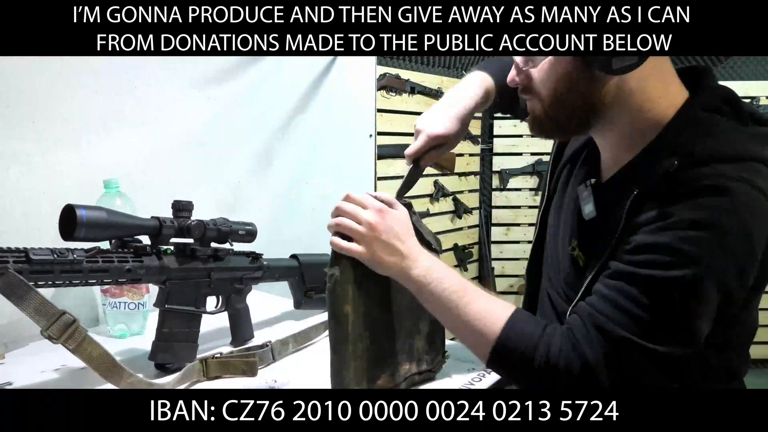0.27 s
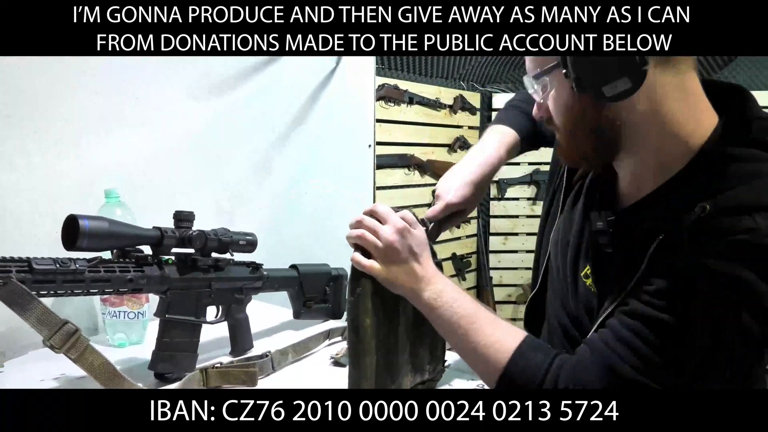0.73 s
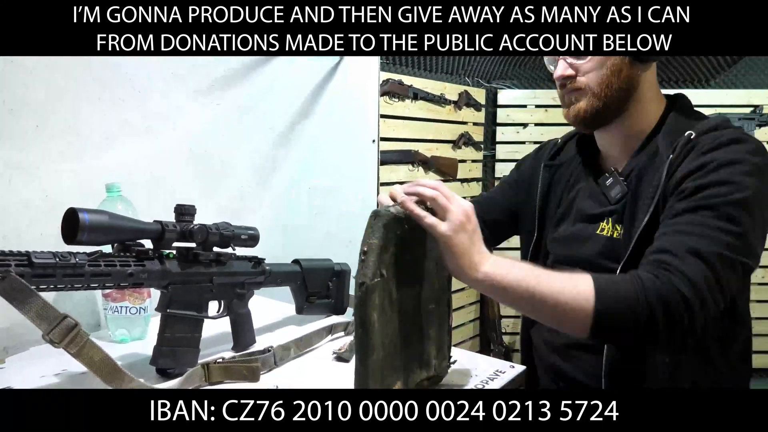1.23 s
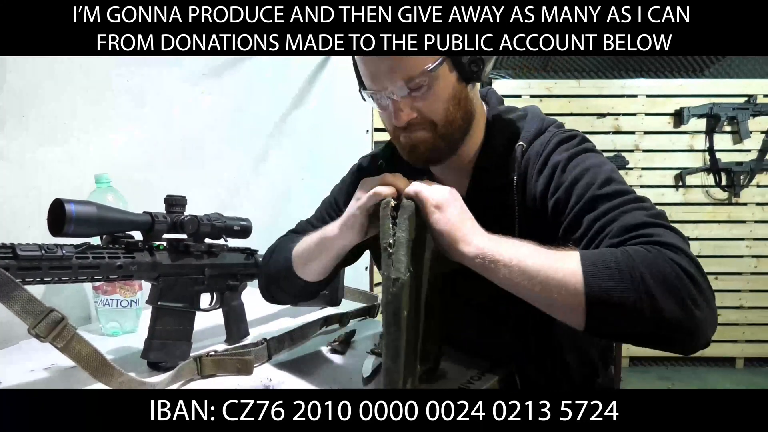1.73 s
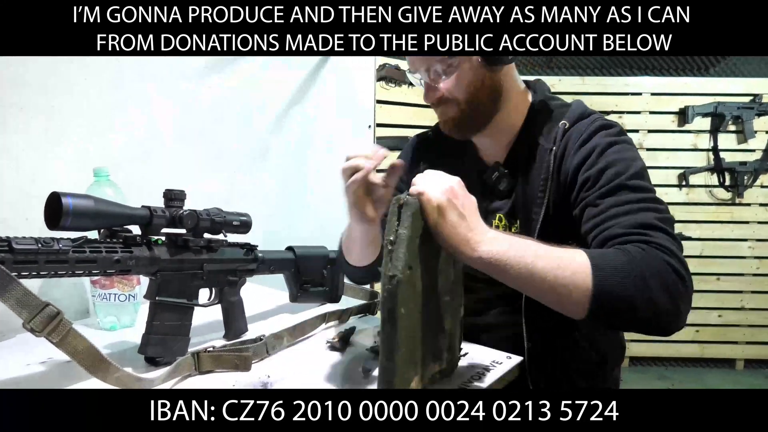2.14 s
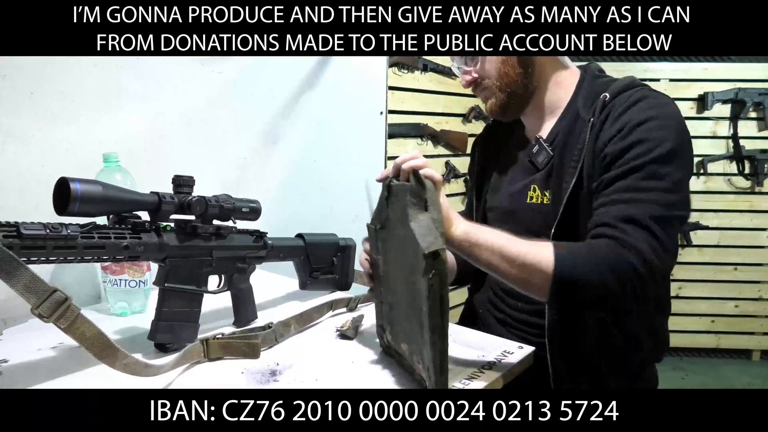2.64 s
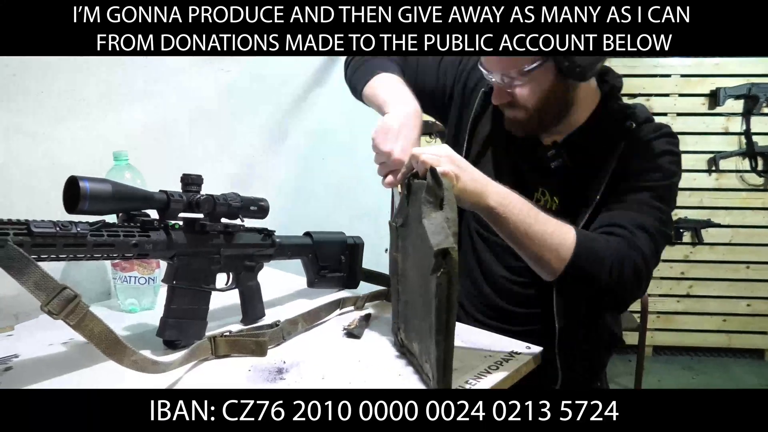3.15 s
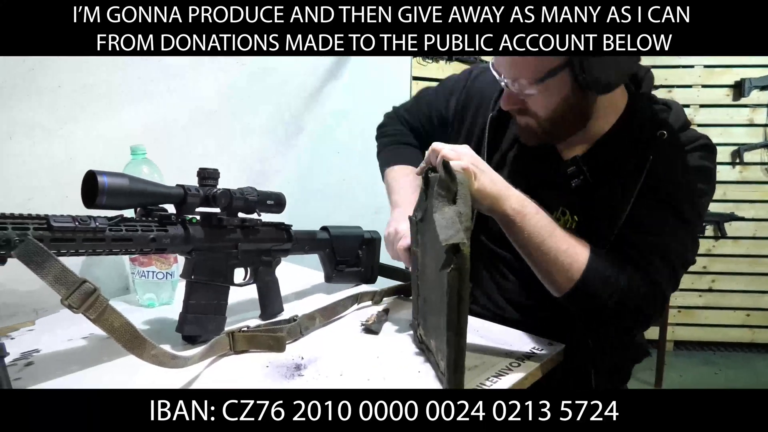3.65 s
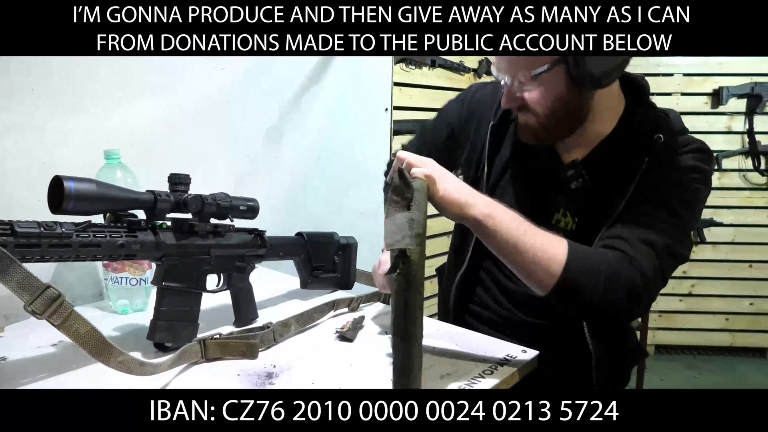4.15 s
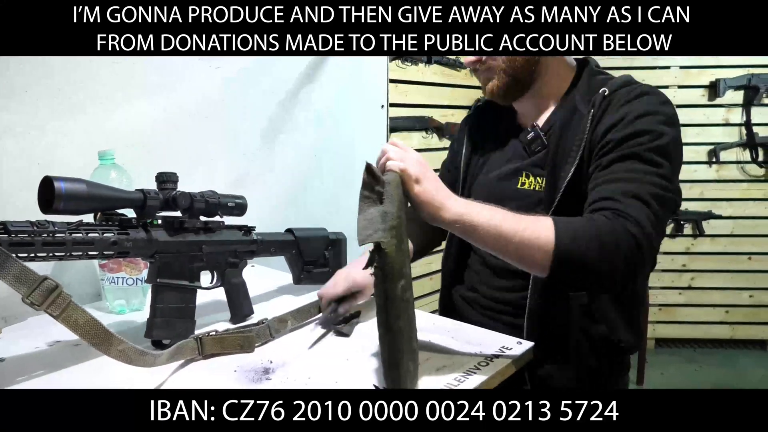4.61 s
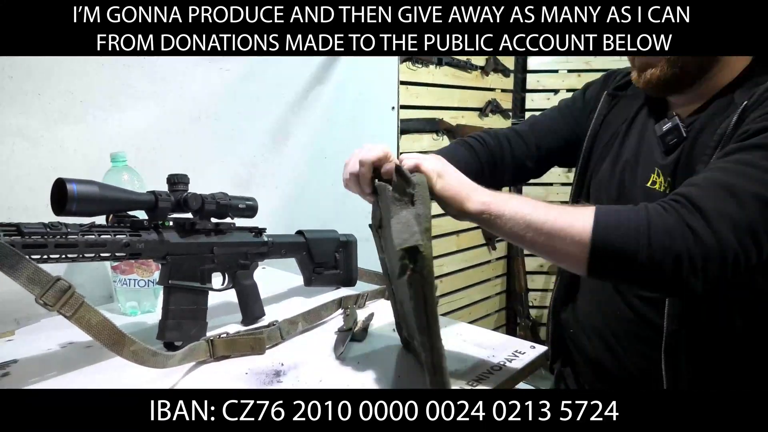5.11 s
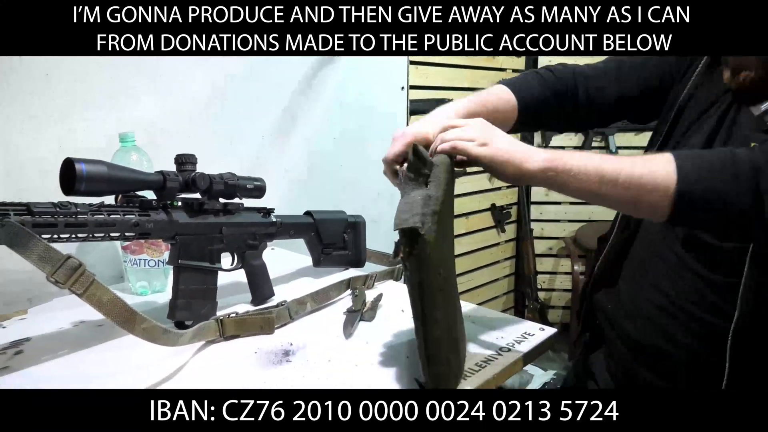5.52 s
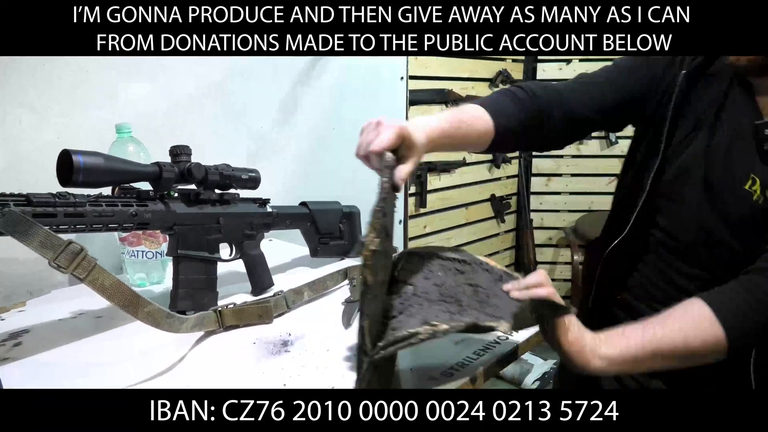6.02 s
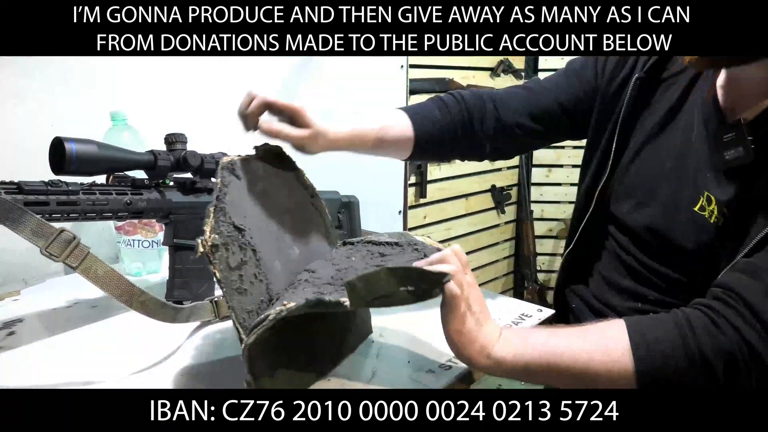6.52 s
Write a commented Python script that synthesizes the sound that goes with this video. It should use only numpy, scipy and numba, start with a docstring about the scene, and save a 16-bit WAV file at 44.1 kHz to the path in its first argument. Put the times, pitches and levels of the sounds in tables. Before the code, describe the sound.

Close mono handling sounds in a small dry room, over steady hiss, low rumble and faint mains hum. A sleeve swishes at the start; from 0.45 to 1.1 s a blade bursts through thick glued fabric in short coarse rips, strongest near 1.0. At 1.2 a tool clatters onto the bench. Cloth rubs softly, then sharp snaps crack at 1.72 and 1.88 amid dull knocks and quick stitch-by-stitch crackling until 2.1, followed by a bright swish and a knock near 2.2. Small foam crackles come around 2.6. From 3.2 to 4.5 thin bright sawing strokes rasp along, with a knock and tiny squeaks at 3.4 and 4.0. A tool clatters down at 4.7. Palms rub and layers peel with fine crackle from 5.0, until two very loud snaps at 5.82 and 5.90, bright crackling, then hollow rubbing, strongest at 6.44, and a small knock at 6.67 before quiet.

```python
"""Short rips, crackles and sharp snaps: a stiff panel of glued fabric and foam is cut and pulled apart.
Rips and rubbing are trains of tiny random fibre breaks, coloured and swelled by each stroke.
Snaps and stitches are single cracks that ring the panel; a tool is twice put down with a clatter.
A blade squeaks as gliding tones; soft knocks and low thumps are fading filtered noise; cloth rustles.
A small dry room adds a short tail of echoes, with steady hiss, low rumble and faint mains hum behind."""
import sys
import numpy as np
from scipy import signal
from scipy.fft import rfft, irfft
from scipy.io import wavfile
from scipy.ndimage import uniform_filter1d
from numba import njit

SR = 44100
rng = np.random.default_rng(int(sys.argv[2]) if len(sys.argv) > 2 else 0)


def file_out(sig):
    """Save sig as 16-bit WAV at sys.argv[1]."""
    # one column per channel
    cols = np.atleast_2d(sig).T
    # limit, then scale
    lim = np.clip(cols, -1, 1)
    pcm = np.round(lim * 32767).astype(np.int16)
    wavfile.write(sys.argv[1], SR, pcm)


N = 298097  # length in samples
TIME = np.arange(N) / SR  # seconds


def undb(db):
    """Turn decibels into a gain."""
    return 10 ** (np.asarray(db) / 20)


def unit(x):
    """Scale to an rms (average strength) of 1."""
    return x / np.sqrt(np.mean(x ** 2) + 1e-18)


def add(out, start, sound):
    """Mix a sound in at a time in seconds."""
    i = max(int(start * SR), 0)
    out[i:i + len(sound)] += sound[:max(N - i, 0)]


def fade(t, t60):
    """Die away smoothly, falling by 60 dB in t60 seconds."""
    return np.exp(-np.log(1000) * t / t60)


def walk(rate):
    """Wander at random in straight lines between values drawn about `rate` times a second."""
    hold = max(int(SR / rate), 1)
    steps = np.repeat(rng.standard_normal(N // hold + 1), hold)
    return uniform_filter1d(steps, hold)[:N]


def response(gain):
    """Make a filter with the given gains that answers as early as possible, with no sound ahead of a hit."""
    cepstrum = irfft(np.log(gain + 1e-6))
    half = len(cepstrum) // 2
    # folding the second half onto the first keeps the gains but removes any early sound
    cepstrum[1:half] *= 2
    cepstrum[half + 1:] = 0
    return irfft(np.exp(rfft(cepstrum)))


def colour(x, points, size=4096):
    """Filter by a curve of (frequency [Hz], level [dB]) points."""
    hz, db = np.transpose(points)
    f = np.fft.rfftfreq(size, 1 / SR) + 1
    gain = undb(np.interp(np.log(f), np.log(hz), db))
    return signal.fftconvolve(x, response(gain))[:len(x)]


def resonance(f, hz, q):
    """Gain of one resonance: 1 at its centre, narrower for a higher q."""
    return 1 / np.sqrt(1 + q ** 2 * (f / hz - hz / f) ** 2)


@njit
def bandpass(x, hz, q):
    """Let through a band around a centre that may move; two stored values act like a ringing spring."""
    y, band, low = np.empty(len(x)), 0., 0.
    for i in range(len(x)):
        g = np.tan(np.pi * min(hz[i], .44 * SR) / SR)
        v = (band + g * (x[i] - low)) / (1 + g * (g + 1 / q))
        band, low, y[i] = 2 * v - band, low + 2 * g * v, v / q
    return y


def fibres(rate, spread_db, bunch_db, bunch_rate, rub_db):
    """Force of tiny fibre breaks (`rate` a second) of uneven size, over smooth rubbing, in bunches."""
    breaks = (rng.random(N) < rate / SR) * rng.choice([-1, 1], N)
    sizes = undb(spread_db * np.minimum(rng.exponential(size=N), 4))
    rubbing = undb(rub_db) * rng.standard_normal(N)
    bunches = undb(bunch_db * walk(bunch_rate))
    return unit((unit(breaks * sizes) + rubbing) * bunches)


def strands(force, share_db, hz=4200, drift=.45, rate=130, q=14, count=3):
    """Breaking fibres pluck their taut neighbours, which twang briefly, each at its own pitch."""
    hold = max(int(SR / rate), 1)
    pitches = hz * np.exp(drift * rng.standard_normal((N // hold + 1, count)))
    twangs = sum(bandpass(force, np.repeat(pitch, hold)[:N], float(q)) for pitch in pitches.T)
    return unit(force + undb(share_db) * unit(twangs))


def registers(force, flex_db=2.5):
    """Split a force into the body, crackle and fizz of the fabric; flexing shifts their balance."""
    # low, middle and high colour of the fabric: (frequency [Hz], relative level [dB])
    body_curve = [(150, -54), (330, -15), (560, -12), (1000, 1), (1450, 1.5), (1900, 6.5), (2300, 5),
                  (3200, -7.5), (6000, -51)]
    crackle_curve = [(900, -33.5), (1800, -17.5), (2400, -2.5), (2900, 1), (3350, 1.5), (3950, -1),
                     (5200, -0.5), (7000, -5.5), (8500, -2), (13000, -41)]
    fizz_curve = [(3500, -41), (6500, -5), (7900, 4.5), (8900, -1.5), (10200, 0.5), (12500, 2), (15500, -8),
                  (18000, 0)]
    curves = (body_curve, crackle_curve, fizz_curve)
    return np.array([unit(colour(force * undb(flex_db * walk(70)), curve)) for curve in curves])


def rips(strokes, force, lead, body_db, fizz_db, fold_db, trim_db, steepness, fold_q=8.4, slacken=0.12):
    """Strokes break fibres hardest at their crest; the taut fold rings and drops in pitch as it comes free."""
    effort, folds = np.zeros((3, N)), np.zeros(N)
    lead = np.clip(lead, .1, .9)  # rising share of a stroke
    for crest, length, db, bite_db, fold_hz in strokes:
        near = np.flatnonzero(abs(TIME - crest) < 2 * length)
        u = (TIME[near] - crest) / length
        side = np.where(u < 0, lead, 1 - lead)
        shape = 1 / (1 + abs(2 * u / side) ** steepness)
        # bite raises body and fizz against the crackle
        balance_db = np.array([[body_db + bite_db], [0], [fizz_db + bite_db]])
        effort[:, near] += shape * undb(db + trim_db + balance_db) ** 2
        fold_pitch = fold_hz * np.exp(-slacken * u / 2)
        fold = unit(bandpass(force[near], fold_pitch, float(fold_q)))
        folds[near] += fold * np.sqrt(shape) * undb(db + trim_db + fold_db)
    return (registers(force) * np.sqrt(effort)).sum(axis=0) + folds


def shake_db(s, hz):
    """A break shakes the panel less the higher it is, and less and less once the layers start to part."""
    base_db, base_hz, db_per_octave = -2, 3200, -13.5
    parting_s, parting_db_per_s = 2.27, -9
    pitch_db = db_per_octave * np.log2(hz / base_hz)
    return base_db + pitch_db + parting_db_per_s * max(s - parting_s, 0)


def add_crack(out, s, db, hz, body_db, q=0.77, body_hz=1150, tick_db=-24, spread_s=0.000903,
              chatter_db=-15, chatter_t60=.02, panel_hz=3300, rebound=0.25, size=1024):
    """A crack and its rebound ring the panel; bending waves bring treble before bass; loose parts chatter."""
    f = np.fft.rfftfreq(size, 1 / SR) + 1
    span = 3 * SR // 1000  # the crack's energy is set as if it lasted 3 ms
    panel = 1 + resonance(f, panel_hz, 6.7) ** 2
    bass_cut = f ** 2 / (f ** 2 + 600 ** 2)
    top = unit((resonance(f, hz, q) ** 3 + undb(tick_db)) * panel * bass_cut)
    body = unit(resonance(f, body_hz, 0.29) ** 5)
    # spread_s is the delay at 1000 Hz; higher tones are delayed less
    dispersion = np.exp(-4j * np.pi * spread_s * np.sqrt(f * 1000))
    # the freed edge swings back about a cycle and a half later
    swing = 1 - rebound * np.exp(-2j * np.pi * f * rng.uniform(1.4, 1.6) / hz)
    crack = irfft(rfft(response(top + undb(body_db) * body)) * dispersion * swing)
    crack *= np.sqrt(span / np.sum(crack ** 2))
    chatter = rng.standard_normal(2 * size) * fade(np.arange(2 * size) / SR, chatter_t60)
    add(out, s, undb(db) * crack)
    add(out, s, undb(db + chatter_db) * signal.fftconvolve(chatter, crack) / np.sqrt(span))


def background():
    """Coloured noise makes steady hiss and low rumble; pure sine tones make the mains hum."""
    # colour of the steady noise: (frequency [Hz], relative level [dB])
    air_curve = [(20, 3.5), (42, 10), (80, -1.5), (160, -6), (300, -4.5), (700, -5.5), (1600, -11),
                 (3200, -20.5), (6000, -5.5), (10000, -18), (16000, -6.5)]
    # mains hum: (frequency [Hz], rms level [dB])
    hum_tones = [(60, -75.5), (120, -78)]
    air_db = -59
    hum = sum(undb(db) * np.sqrt(2) * np.sin(2 * np.pi * hz * TIME) for hz, db in hum_tones)
    return undb(air_db) * unit(colour(rng.standard_normal(N), air_curve)) + hum


def rustle(trim_db=1.5, body_db=-4, fizz_db=-2, crease_db=0, drift=0.32):
    """Cloth slides while the hands change their grip; shifting creases colour the rubbing."""
    # cloth and foam shifting under the hands: (time [s], level before trim [dB])
    rustle_levels = [(0.0, -60), (0.13, -58), (0.47, -58.5), (0.68, -58.5), (0.79, -55), (1.6, -59.5),
                     (1.96, -53.5), (2.45, -58), (2.96, -60), (3.18, -65.5), (4.44, -61), (4.89, -52),
                     (4.99, -54.5), (5.16, -59), (5.33, -64), (5.91, -60), (6.01, -55), (6.76, -62.5)]
    db = np.interp(TIME, *np.transpose(rustle_levels))
    force = fibres(rate=3000, spread_db=5.0, bunch_db=3.0, bunch_rate=63, rub_db=-1.5)
    creases = sum(bandpass(force, hz * np.exp(drift * walk(13)), 7.9) for hz in (1500, 4200, 9500))
    cloth = registers(force + undb(crease_db) * creases)
    return undb(trim_db + db) * (undb([body_db, 0, fizz_db]) @ cloth)


def swishes():
    """Sleeves brush the fabric: light cloth passes over the weave with an airy hiss."""
    # brushes: (crest time [s], length [s], level before trim [dB], bite [dB], fold resonance [Hz])
    brushes = [(.015, 0.094, -48.5, 5.5, 9150), (.078, 0.05, -40, -2, 6840),
               (1.627, 0.042, -46.5, 6.5, 12400), (2.135, 0.057, -32, -9, 11900),
               (2.429, .065, -37, -2, 7000), (2.537, 0.13, -46, -0.5, 8900),
               (2.955, 0.018, -47.5, -1, 8900), (3.098, 0.038, -40, -2, 9600),
               (6.015, 0.031, -29, -3, 11700), (6.313, 0.031, -45, -2.5, 6500)]
    force = fibres(rate=3500, spread_db=2, bunch_db=4.5, bunch_rate=220, rub_db=-5)
    return rips(brushes, force, lead=0.52, body_db=-11, fizz_db=3, fold_db=0.5, trim_db=-5.0, steepness=5.1)


def snaps():
    """Threads and glue bonds let go one at a time, and loose parts chatter after them."""
    # single breaks: (time [s], level [dB], centre frequency [Hz])
    breaks = [(.073, -33.5, 8000), (0.3736, -39.5, 5540), (.5467, -29.5, 4420), (0.6973, -27.5, 4870),
              (.7752, -35.5, 7760), (.813, -38.5, 6000), (.9761, -28.5, 6800), (.9937, -28.5, 7600),
              (1.4347, -34.5, 4230), (1.7079, -28, 3680), (1.7209, -15.5, 3340), (1.8789, -14.5, 3080),
              (1.899, -32, 3240), (2.113, -40, 4500), (2.1862, -33, 4700), (2.2626, -36.5, 5650),
              (2.3033, -36, 3800), (2.3182, -33.5, 6170), (3.1961, -32, 7000), (3.2138, -29, 10000),
              (3.734, -25, 8300), (4.1349, -37, 5300), (4.1498, -34, 3770), (4.3375, -27.5, 6840),
              (4.3513, -28, 3950), (4.455, -36, 3750), (4.842, -23, 4570), (4.8634, -28, 3900),
              (5.071, -38, 7100), (5.1896, -26.5, 3650), (5.5081, -34, 3400), (5.8219, -9.5, 5280),
              (5.8964, -8.5, 5800), (5.913, -25, 5300), (5.9849, -32, 3740)]
    out = np.zeros(N)
    for s, db, hz in breaks:
        add_crack(out, s, db, hz, shake_db(s, hz), chatter_db=-11.5, chatter_t60=0.034)
    return out


def knocks(q=0.63, trim_db=-2, size=8192):
    """Dull knocks, and low thumps under the two loudest snaps: fading noise through one broad resonance."""
    # knocks of hands and panel; the two 140 Hz rows are the low thumps under the two loudest snaps:
    # (time [s], level before trim [dB], centre frequency [Hz], 60 dB fade time [s])
    knock_rows = [(0.097, -40.5, 1400, 0.16), (.238, -43, 800, 0.065), (0.755, -36, 1300, .024),
                  (1.569, -43, 700, .03), (1.7599, -30.5, 700, 0.011), (1.7791, -25, 590, 0.015),
                  (1.81, -32, 815, 0.061), (1.841, -39, 700, 0.016), (1.858, -27, 750, .014),
                  (2.1735, -23.5, 740, 0.028), (2.1865, -27.5, 736, 0.06), (2.718, -43, 1230, 0.092),
                  (3.105, -43.5, 930, 0.075), (3.4189, -30.5, 1140, 0.096), (5.11, -38, 1530, 0.061),
                  (5.821, -37, 140, .008), (5.897, -37, 140, .008), (6.55, -52.5, 450, 0.083),
                  (6.668, -40, 2770, 0.04)]
    out, t = np.zeros(N), np.arange(size) / SR
    f = np.fft.rfftfreq(size, 1 / SR) + 1
    for s, db, hz, t60 in knock_rows:
        bass_cut = 1 / (1 + (280 / f) ** 4)
        body = response(resonance(f, hz, q) ** 2 * bass_cut)
        noise = rng.standard_normal(size) * fade(t, t60)
        add(out, s, undb(db + trim_db) * signal.fftconvolve(noise, body) / np.sqrt(np.sum(body ** 2)))
    return out


def peels():
    """Fine crackle with almost no body: foam peels from its glue, and one row fills out a bright swish."""
    # peels of foam, but the row at 2.135 s is the middle-pitched part of the bright swish at that time:
    # (crest time [s], length [s], level before trim [dB], bite [dB], fold resonance [Hz])
    crackles = [(.34, 0.035, -52, 0, 5000), (2.135, 0.049, -35.5, 5.5, 4600), (2.611, 0.02, -38, 4, 3830),
                (2.675, 0.041, -42, 7.5, 4350), (2.733, 0.015, -40, -2, 3480), (4.532, 0.022, -37, 8, 4600),
                (5.085, 0.039, -45, -6, 2880), (5.155, .05, -50, -6, 3250), (5.35, 0.15, -49, -9, 6260),
                (5.485, 0.036, -44, 5, 3300), (5.62, 0.075, -40, 9, 3450), (5.775, 0.065, -50.5, 6, 3400),
                (5.853, 0.056, -32.5, 1.5, 5100), (5.917, 0.062, -30, -9, 6700),
                (6.026, 0.061, -31, 6, 4440)]
    force = fibres(rate=2000, spread_db=2.5, bunch_db=3.2, bunch_rate=220, rub_db=-3)
    force = strands(force, share_db=-4, hz=4800, drift=0.36)
    return rips(crackles, force, lead=0.5, body_db=-15, fizz_db=-6, fold_db=1, trim_db=-6.0, steepness=3.67)


def seams(scatter_db=1.0, body_db=-4, unevenness=0.37):
    """A seam gives way stitch by stitch in an uneven train, each stitch a short burst of parting strands."""
    # stretches: (start [s], end [s], breaks per second [1/s], middle level [dB], middle pitch [Hz])
    stretches = [(.45, .75, 70, -44, 4000), (1.655, 1.72, 110, -45, 3600), (1.75, 1.865, 70, -45, 3300),
                 (1.915, 1.98, 100, -41, 3900), (1.995, 2.11, 120, -37, 3900), (5.04, 5.4, 55, -49, 4800)]
    out = np.zeros(N)
    for start, end, rate, db, hz in stretches:
        chance = rng.standard_normal((40, 3))
        for s, (late, loud, high) in zip(np.arange(start, end, 1 / rate), chance):
            stitch_s = s + unevenness * late / rate
            stitch_db = db + scatter_db * loud
            stitch_hz = hz * np.exp(0.23 * high)
            add_crack(out, stitch_s, stitch_db, stitch_hz, body_db + shake_db(s, hz),
                      q=0.72, tick_db=-21.5, chatter_db=-3.5, chatter_t60=0.031)
    return out


def cuts(fold_hz=3400):
    """The blade bursts through thick glued fabric: coarse, full-bodied rips."""
    # cuts; a deeper bite has more body and fizz:
    # (crest time [s], length [s], level before trim [dB], bite [dB])
    pushes = [(0.487, .03, -35.5, 4), (0.523, 0.033, -42.5, 0.5), (0.548, 0.019, -30, -5),
              (0.582, 0.024, -45, 5), (0.652, 0.027, -34.5, -6), (0.693, 0.036, -35.5, 1),
              (0.721, .03, -42.5, 0), (.831, 0.029, -34.5, 3), (0.868, 0.048, -39, 3.5),
              (1.003, .022, -33, 4.5), (1.022, .013, -21.5, 2), (1.063, 0.022, -32.5, -0.5),
              (2.315, 0.02, -35.5, 0)]
    force = fibres(rate=1700, spread_db=2.5, bunch_db=2.5, bunch_rate=300, rub_db=-7.5)
    force = strands(force, share_db=-4.5, hz=4240, drift=.5)
    strokes = [(*push, fold_hz) for push in pushes]
    return rips(strokes, force, lead=0.46, body_db=-2, fizz_db=-4, fold_db=-6, trim_db=-2.5, steepness=4.43)


def clatter(hz=5100, ring_db=-4, rattle_ring_db=-1, t60=0.089, body_db=-25, count=4):
    """A tool lands one end at a time, then rebounds ever quicker; each hit rings tool and bench."""
    # tool put down: (first end [s], level [dB], second end [s], level [dB],
    # first rebound level [dB], loss per rebound [dB], first gap [s])
    drops = [(1.1912, -24, 1.194, -15, -27.5, 0.5, .009), (4.6818, -16, 4.6987, -19, -27, 3, .0125)]
    # ringing of tool and bench top: (frequency [Hz], relative level [dB])
    bench_curve = [(250, -47.5), (550, -13.5), (1500, -11.5), (1950, 1.5), (2300, -7), (2950, 4.5),
                   (3900, -10), (5400, -5), (6600, -5.5), (9000, -16), (16000, -22)]
    gap_shrink = .88  # each gap is this share of the one before
    out, t = np.zeros(N), np.arange(SR // 4) / SR
    for first_s, first_db, second_s, second_db, rebound_db, loss_db, gap in drops:
        times = second_s + np.cumsum(gap * gap_shrink ** np.arange(count))
        landings = [(first_s, first_db, ring_db), (second_s, second_db, ring_db)]
        rebounds = [(s, rebound_db - k * loss_db, rattle_ring_db) for k, s in enumerate(times)]
        for s, db, ring in landings + rebounds:
            add_crack(out, s, db, hz, body_db, q=0.63, tick_db=-24, spread_s=0.000602,
                      chatter_db=-7, chatter_t60=0.013)
            ringing = unit(colour(rng.standard_normal(len(t)), bench_curve)) * fade(t, t60)
            add(out, s, undb(db + ring) * ringing)
    return out


def slides(fold_hz=1850):
    """A palm rubs the panel: smooth, broad friction with a hollow ring."""
    # palm strokes: (crest time [s], length [s], level before trim [dB], bite [dB])
    rubs = [(1.4, .14, -51.5, 3.5), (1.815, 0.018, -41, -4), (2.93, .32, -59, 5), (4.554, 0.12, -46, 0.5),
            (4.805, 0.17, -49.5, -2), (4.989, 0.15, -44, -2.5), (5.661, 0.1, -41, -1),
            (6.102, 0.24, -47.5, -0.5), (6.443, 0.044, -28, 1.5)]
    force = fibres(rate=4000, spread_db=4.5, bunch_db=1.5, bunch_rate=100, rub_db=1.5)
    strokes = [(*rub, fold_hz) for rub in rubs]
    return rips(strokes, force, lead=0.48, body_db=-2.5, fizz_db=-2.5, fold_db=-15.5, trim_db=-3.5,
                steepness=4.66)


def saws(fold_hz=10700):
    """The blade rasps along the foam in thin, bright, light sawing strokes."""
    # strokes down the seam: (crest time [s], length [s], level before trim [dB])
    rasps = [(3.231, 0.038, -38), (3.335, 0.038, -39), (3.411, 0.032, -38), (3.47, 0.068, -39),
             (3.556, .05, -39), (3.695, 0.071, -36.5), (3.793, 0.031, -37), (3.942, 0.071, -42.5),
             (4.065, 0.12, -43), (4.196, 0.064, -41), (4.314, 0.039, -42), (4.385, 0.063, -38.5),
             (4.481, 0.028, -37)]
    force = fibres(rate=1600, spread_db=3.0, bunch_db=4.5, bunch_rate=200, rub_db=-5.5)
    force = strands(force, share_db=-11, hz=3420, drift=.3)
    strokes = [(*rasp, 0, fold_hz) for rasp in rasps]
    return rips(strokes, force, lead=0.62, body_db=-9, fizz_db=1.5, fold_db=-3.5, trim_db=-4.0,
                steepness=3.22)


def squeaks(jitter=0.11, count=5):
    """The blade sticks and slips so fast that it whistles: a gliding, trembling tone with overtones."""
    # squeaks: (start [s], end [s], level [dB], first pitch [Hz], middle pitch [Hz], last pitch [Hz],
    # level step from one overtone to the next [dB])
    whistles = [(3.435, 3.448, -30.5, 14700, 11700, 8100, -40),
                (3.447, 3.449, -21, 10300, 9700, 12600, -40), (4.002, 4.016, -30.5, 2940, 2310, 4240, -1.5),
                (4.068, 4.074, -33.5, 7000, 7200, 7800, -22)]
    out = np.zeros(N)
    for start, end, db, first_hz, middle_hz, last_hz, step_db in whistles:
        u = np.linspace(0, 1, max(int((end - start) * SR), 64))
        glide = np.interp(u, [0, .5, 1], [first_hz, middle_hz, last_hz])
        hz = glide * (1 + jitter * walk(2400)[:len(u)])
        phase = 2 * np.pi * np.cumsum(hz) / SR
        tone = np.zeros(len(u))
        for k in range(count):
            audible = (k + 1) * hz < SR / 2  # leave out what the sample rate cannot hold
            tone += undb(step_db * k) * np.sin((k + 1) * phase) * audible
        grip = undb(4 * walk(1500)[:len(u)])
        add(out, start, undb(db) * unit(tone * grip * np.sin(np.pi * u)))
    return out


def room(x, wet_db=-23, t60=0.29, damp_hz=6000):
    """The bench and nearby walls add a short, dull tail, made of fading noise."""
    t = np.arange(SR // 2) / SR
    tail = rng.standard_normal(len(t)) * fade(t, t60) * (t > .004)  # starts after 4 ms
    tail = signal.sosfilt(signal.butter(1, damp_hz, fs=SR, output="sos"), tail)
    return x + undb(wet_db) * signal.fftconvolve(x, tail / np.sqrt(np.sum(tail ** 2)))[:N]


def scene():
    """All the handling sounds in the room, over the background, on one channel."""
    rubbing = rustle() + swishes() + slides()
    tearing = cuts() + saws() + peels() + snaps() + seams() + squeaks()
    return (room(rubbing + tearing + clatter() + knocks()) + background())[None]


def record(dry):
    """The recorder clips any peak beyond full scale, then steeply cuts the top."""
    top_hz = 16000
    low_pass = signal.ellip(8, .2, 70, top_hz, fs=SR, output="sos")
    return signal.sosfilt(low_pass, np.clip(dry, -1, 1))


dry = scene()
out = record(dry)
file_out(out)
```